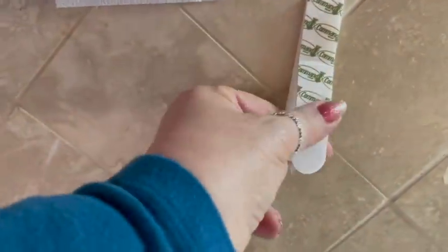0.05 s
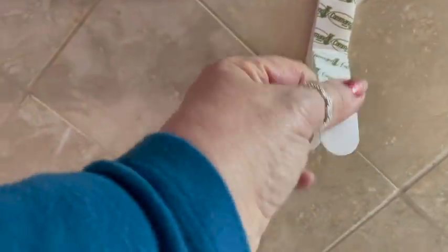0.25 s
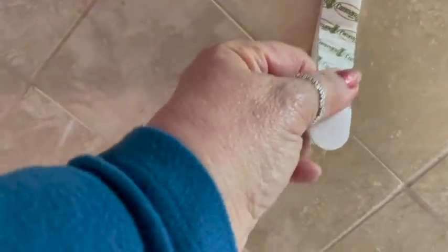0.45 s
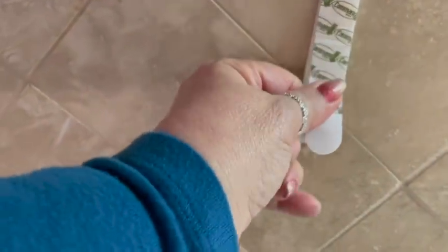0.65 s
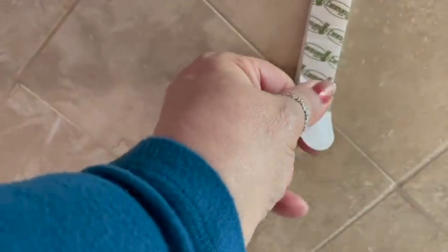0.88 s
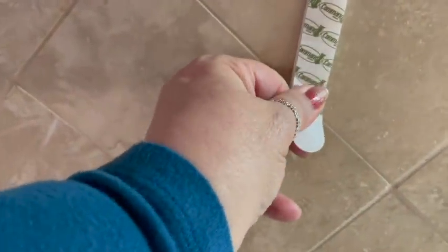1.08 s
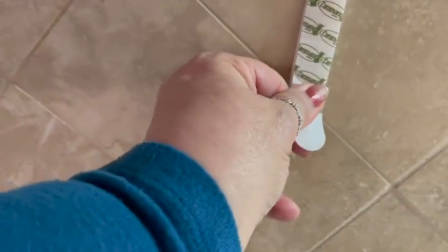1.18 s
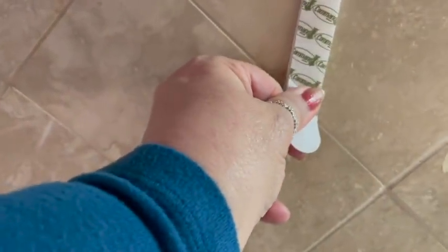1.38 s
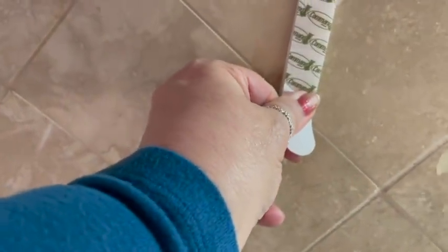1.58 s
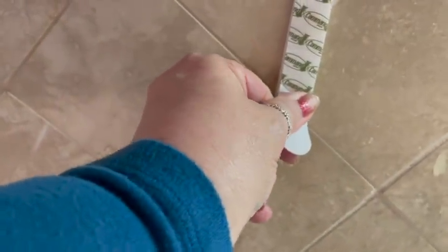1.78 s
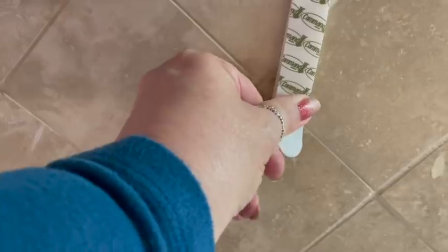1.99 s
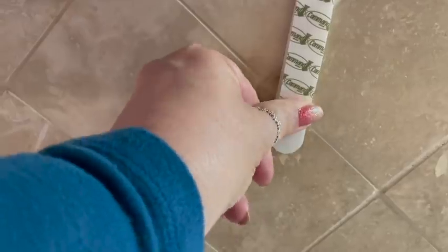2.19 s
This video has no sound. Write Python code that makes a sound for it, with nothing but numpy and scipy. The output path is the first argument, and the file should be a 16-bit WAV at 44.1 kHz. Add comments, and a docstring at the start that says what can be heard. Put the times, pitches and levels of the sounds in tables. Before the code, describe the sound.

Crisp crackling snaps of adhesive fastener strips pressed together by hand, followed by sparse loud clicks

```python
"""A hand presses two hook-and-loop strips together against a tiled wall, close to the microphone.
Over a faint room hum, plastic hooks snap home in a crunching run, then one by one: sharp pulses that ring
the strip and scatter off hand and tiles. Skin slides as grainy noise and the thumb thuds as damped sines.
A thin high whine joins later; near the end, noise-puff fingertip taps and a resonant fingernail click."""
import sys
import numpy as np
from scipy import signal
from scipy.fft import rfft, irfft, next_fast_len
from scipy.io import wavfile

SR = 44100
rng = np.random.default_rng(int(sys.argv[2]) if len(sys.argv) > 2 else 0)


def store_wav(level_fs):
    """Save 16-bit WAV to argv[1]."""
    pcm = np.round(np.clip(np.atleast_2d(level_fs), -1, 1) * 32767)
    wavfile.write(sys.argv[1], SR, pcm.T.astype(np.int16))


N = 99225
TIME = np.arange(N) / SR

# spectrum of a hook's snap: hz, level_db
SNAP_SPECTRUM = [(150, -24), (700, -16), (1500, -8), (2300, -6), (3000, -4.5), (4200, -1), (5700, -4.5),
                 (7000, -1.5), (8400, -3), (10500, 1), (12000, -4), (14000, 1), (15500, -4.5),
                 (17000, -30.5)]
# spectral regions of a snap's ring and top: hz, share
RING_REGION = [(5500, 0), (7500, 1), (9800, 1), (12500, 0)]
TOP_REGION = [(10000, 0), (13500, 1)]
# modes of the strip: hz, level_db (before each snap's chance offset)
STRIP_MODES = [(1085, -39), (1480, -48), (2450, -48), (3700, -50), (7500, -52), (10400, -52), (13900, -48)]


def from_db(db):
    """Decibels to gain."""
    return 10 ** (np.asarray(db) / 20)


def rms_one(x):
    """Scale to unit rms."""
    return x / np.sqrt(np.mean(x ** 2) + 1e-20)


def bins(size):
    """Transform frequencies in Hz, floored at 1 Hz for the logarithm."""
    return np.maximum(np.fft.rfftfreq(size, 1 / SR), 1)


def at_hz(points, hz):
    """Interpolate a spectrum on a log-frequency axis."""
    point_hz, values = np.transpose(points)
    return np.interp(np.log(hz), np.log(point_hz), values)


def level(points):
    """Gain over time from (s, dB) points."""
    return from_db(np.interp(TIME, *np.transpose(points)))


def colour(x, db_at):
    """Causal minimum-phase filter, by cepstrum folding, with the given dB at each frequency."""
    size = 2 * next_fast_len(x.shape[-1])
    cepstrum = irfft(np.log(from_db(db_at(bins(size)))))
    cepstrum[1:size // 2] *= 2
    cepstrum[size // 2 + 1:] = 0
    response = np.exp(rfft(cepstrum))
    return irfft(rfft(x, size) * response)[..., :x.shape[-1]]


def stereo_noise(side_db, size=N):
    """White noise, partly shared by both channels; side_db is side relative to mid."""
    mid, side = rng.standard_normal((2, size))
    return rms_one(mid + from_db(side_db) * side * np.array([[1], [-1]]))


def tail(t60_s, side_db, size):
    """Dense dying reflections of unit energy."""
    x = stereo_noise(side_db, size=size) * from_db(-60 * TIME[:size] / t60_s)
    return rms_one(x) / np.sqrt(size)


def add(out, start_s, x):
    """Mix a sound in at a time."""
    i = max(int(start_s * SR), 0)
    out[..., i:i + x.shape[-1]] += x[..., :max(N - i, 0)]


def grains(per_s, spread_db):
    """Random tiny clicks of uneven size and either sign."""
    sizes = from_db(spread_db * np.minimum(rng.exponential(1, N), 4)) * rng.choice([-1, 1], N)
    return sizes * (rng.random(N) < per_s / SR)


def spray(size):
    """Near reflections off hand and tiles: a quick burst and a fainter, longer one."""
    side_db, late_db = -7, -12
    early = tail(.036, side_db, size=size)
    late = tail(.07, side_db, size=size)
    return early + from_db(late_db) * late


def patch(f, pitch_hz):
    """Resonance of the patch of strip that flexes, in dB."""
    peak_db, half_width_share = 11.5, 0.044
    return peak_db / (1 + ((f / pitch_hz - 1) / half_width_share) ** 2)


def snaps(size=6000):
    """Each hook gives one sharp pulse, two echoes, the strip's modes and a spray of near reflections."""
    # hooks: start_s, level_db, body_db, ring_db, top_db, scatter_db, patch_pitch_hz
    hooks = [(0.0333, -29.5, -8.5, -0.5, 3, -1, 5160), (0.149, -25.5, -8.5, 7, 3, 4.5, 2480),
             (0.156, -18.5, -3, -0.5, 6, 1.5, 1160), (0.1919, -19.5, -12, 1, -1.5, 4, 2400),
             (0.2099, -26.5, -2, 4, -2.5, 6.5, 6200), (0.2446, -19.5, -3.5, 5.5, -2, 2.5, 14700),
             (0.2562, -13, -5, 1, 4, 6.5, 14380), (0.2638, -11.5, -6, 7, 5, 0, 14680),
             (0.2719, -25.5, 0, 6, 1.5, 2.5, 6725), (0.2743, -7, -20.5, 14, 11.5, 0.5, 1114),
             (0.2772, -8, 2, 0.5, 2.5, -2.5, 2630), (0.2846, -11.5, 6.5, 0, 3, 0, 1475),
             (.289, -3.5, -2, 11, 1, 2.5, 1074), (0.297, -20, -3, 4.5, -0.5, 0.5, 1060),
             (0.3144, -9, 2, 16.5, 5.5, 2.5, 1095), (0.329, -7, -1, 7, 1, -6.5, 1090),
             (0.337, -13, 0, 7.5, -6.5, -1.5, 2523), (0.34, -2.5, -9, 8, 6, -1.5, 1050),
             (0.3692, -1, -7.5, 6, 2.5, 5, 1045), (0.4253, -10.5, -3, 3, -4, 0, 2440),
             (0.4349, -8.5, -3, 0.5, 1.5, -8.5, 2750), (0.4358, -3, -9, 10.5, -2.5, 5, 3650),
             (0.458, -14, -10, -0.5, -2, 0, 6620), (.502, 0, -2.5, 7, 0.5, 0.5, 2110),
             (0.783, -33, -7, -3.5, -4, 6.5, 7600), (1.645, -15, -11, -5, 4.5, 8.5, 3390),
             (1.8606, -21.5, -11, -3.5, -0.5, 13.5, 2250), (1.8775, 8, -13, -2.5, -5.5, 4.5, 2530),
             (1.9167, -18, -4, 2.5, 0.5, 6, 1120), (1.94, -20, -4.5, 6.5, 6.5, 0, 2460)]
    # region of a snap's body: hz, share
    body_region = [(3000, 1), (6500, 0)]
    # first reflections off hand and wall: delay_s (before jitter), level_db
    echoes = [(.00105, -11), (.0022, -14)]
    strip_t60_s, mode_spread_db, echo_jitter_share = .065, 2, .06
    ripple_db, ripple_step_hz = 1.5, 361.6  # chance unevenness of each snap's spectrum
    same_path_share = .6  # energy share of reflections in common: the hand hardly moves

    out, t = np.zeros((2, N)), TIME[:size]
    knots_hz = np.arange(80) * ripple_step_hz
    same_paths = spray(size)
    for start_s, db, body_db, ring_db, top_db, scatter_db, pitch_hz in hooks:
        own_paths = spray(size)
        paths = np.sqrt(same_path_share) * same_paths + np.sqrt(1 - same_path_share) * own_paths
        x = from_db(scatter_db) * paths
        x[:, 0] += 1  # direct pulse
        for delay_s, echo_db in echoes:
            x[:, int(delay_s * SR * (1 + echo_jitter_share * rng.normal()))] += from_db(echo_db)
        for hz, mode_db in STRIP_MODES:
            decay_db = mode_db + mode_spread_db * rng.normal() - 60 * t / strip_t60_s
            x += from_db(decay_db) * np.cos(2 * np.pi * hz * t)
        ripple = ripple_db * rng.standard_normal(len(knots_hz))

        def snap_db(f):
            """Spectrum of this snap in dB."""
            regions = body_db * at_hz(body_region, f) + ring_db * at_hz(RING_REGION, f)
            regions += top_db * at_hz(TOP_REGION, f)
            uneven = np.interp(f, knots_hz, ripple)
            return db + at_hz(SNAP_SPECTRUM, f) + regions + patch(f, pitch_hz) + uneven

        add(out, start_s, colour(x, snap_db))
    return out


def crunch():
    """Many small hooks give way between the big snaps and ring the strip's lowest mode."""
    # crackle before scatter and colour: time_s, level_db
    crackle = [(0, -74.5), (.12, -71.5), (.23, -63.5), (.272, -36.5), (.298, -30.5), (.32, -48), (.42, -58),
               (.47, -53.5), (.6, -76.5)]
    hooks_per_s, spread_db, scatter_db = 550, 3.5, -3.5
    mode_hz = STRIP_MODES[0][0]
    clicks = rms_one(grains(hooks_per_s, spread_db)) * level(crackle)
    scattered = signal.fftconvolve(clicks[None], spray(size=3000))[:, :N]
    x = clicks + from_db(scatter_db) * scattered
    return colour(x, lambda f: at_hz(SNAP_SPECTRUM, f) - 3 * at_hz(RING_REGION, f)
                  + 2 * at_hz(TOP_REGION, f) + patch(f, mode_hz))


def rubs():
    """Skin slides on the backing paper: grains plus noise in short swishes."""
    # swishes: peak_s, rise_s, fall_s, level_db, tilt_db_per_octave
    swishes = [(0.09, 0.003, 0.018, -81, 12), (1.813, 0.012, 0.073, -66, 9.5),
               (1.878, 0.0061, 0.018, -33.5, 10), (1.93, 0.0042, 0.0076, -40.5, 6.5),
               (2.041, 0.0026, 0.042, -55.5, 7), (2.145, 0.012, 0.013, -51, -6)]
    # skin on paper: hz, level_db
    spectrum = [(300, -1), (600, -16.5), (1100, -3), (2400, 6), (3300, -1.5), (6000, -10.5), (9000, -9.5),
                (15000, -19)]
    out = np.zeros((2, N))
    for peak_s, rise_s, fall_s, db, tilt in swishes:
        friction = rms_one(grains(per_s=2700, spread_db=1)) + stereo_noise(side_db=-4.5)
        # tilt pivots at 2 kHz and is flat below 700 Hz
        x = rms_one(colour(friction, lambda f: at_hz(spectrum, f)
                           + tilt * np.log2(np.maximum(f, 700) / 2000)))
        envelope = np.exp(-np.maximum((peak_s - TIME) / rise_s, (TIME - peak_s) / fall_s))
        out += x * from_db(db) * envelope
    return out


def taps():
    """A fingertip taps the paper dully: noise puffs that start at once and die quickly."""
    # contacts: start_s, level_db, fall_s
    contacts = [(1.585, -53, .012), (2.039, -57, .016), (2.121, -56, .012)]
    # dull tap: hz, level_db
    spectrum = [(200, 13.5), (400, 2.5), (600, 1), (1100, 0.5), (1600, -21), (3000, -39), (8000, -44.5)]
    out = np.zeros((2, N))
    for start_s, db, fall_s in contacts:
        puff = rms_one(colour(stereo_noise(side_db=-2.0), lambda f: at_hz(spectrum, f)))
        add(out, start_s, puff * from_db(db) * np.exp(-TIME / fall_s))
    return out


def nail():
    """A fingernail clicks on the strip's edge: a scattered pulse with a few hollow resonances."""
    # resonances: hz, width_hz (full, at half amplitude), level_db
    resonances = [(1140, 170, -14.5), (1690, 460, -13), (3430, 230, -7), (4500, 2300, -15.5),
                  (10900, 5700, -21)]
    start_s = 2.0808

    def click_db(f):
        """Summed power of the resonances in dB."""
        return 10 * np.log10(sum(from_db(db) ** 2 / (1 + (2 * (f - hz) / width_hz) ** 2) ** 2
                                 for hz, width_hz, db in resonances))

    out, x = np.zeros((2, N)), spray(size=6000)
    x[:, 0] += 1  # direct pulse
    add(out, start_s, colour(x, click_db))
    return out


def thuds():
    """The thumb pushes on the wall: damped sines with a soft attack."""
    # pushes: start_s, level_db (before attack), pitch_hz, t60_s
    pushes = [(0.2332, -26.5, 274, 0.026), (.236, -39, 371, 0.15), (0.2433, -20.5, 197, 0.029),
              (0.243, -50, 82, 0.28), (0.2566, -31.5, 84, .13), (.282, -40, 160, .1),
              (.343, -46, 70.2, 0.19), (1.585, -51, 200, 0.076), (1.88, -40.5, 194.7, 0.064),
              (1.938, -42, 77, 0.13), (2.051, -45.5, 72, 0.15)]
    attack = 1 - np.exp(-TIME / 0.0032)
    out = np.zeros(N)
    for start_s, db, hz, t60_s in pushes:
        decay = from_db(db - 60 * TIME / t60_s)
        add(out, start_s, decay * attack * np.sin(2 * np.pi * hz * TIME))
    return out


def handling():
    """Low rustle of the hand: coloured noise of varying level."""
    # rustle: time_s, level_db
    rustle = [(0, -78), (.2, -64), (.25, -44), (.29, -43), (.32, -48), (.38, -50), (.43, -57), (.53, -56),
              (.85, -76), (1.8, -80), (1.9, -58), (2.25, -70)]
    # rustle colour: hz, level_db
    spectrum = [(30, -19.5), (80, 3), (200, -2.5), (380, -10.5), (600, -14.5), (1200, -14.5), (3000, -35)]
    return level(rustle) * rms_one(colour(stereo_noise(side_db=-11.5), lambda f: at_hz(spectrum, f)))


def ports(x):
    """The two microphone ports differ in phase and level."""
    # level balance: hz, left_minus_right_db
    balance = [(100, -0.5), (600, 10.5), (1300, 4), (2400, 0.5), (4400, 5.5), (6800, 5), (8500, 1),
               (15000, -0.5)]
    # phase by which the left port leads: hz, phase_rad
    lead = [(100, 0), (1000, 0), (3000, .6), (3700, 1.3), (5000, 1), (6000, -1), (6700, -1.2), (7600, -2.7),
            (10200, -4), (11900, -5.6), (13500, -6.3)]
    f = bins(2 * N)
    half_db = at_hz(balance, f) / 2
    left = from_db(half_db) * np.exp(1j * at_hz(lead, f))
    right = from_db(-half_db)
    return irfft(rfft(x, 2 * N) * np.array([left, right]))[:, :N]


def room(x):
    """Dull tail of the tiled room: convolution with coloured dying noise."""
    # tail colour: hz, level_db
    spectrum = [(200, -8), (600, -2), (1200, -5), (1900, -13), (2600, -14), (5000, -20), (7500, -29),
                (9000, -41), (14000, -32)]
    response = colour(tail(.55, side_db=-2.5, size=40000), lambda f: at_hz(spectrum, f))
    return signal.fftconvolve(x, response, axes=1)[:, :N]


def air_and_hiss():
    """Low room drone and faint hiss: two steady coloured noises."""
    # room's low drone: hz, level_db
    air_spectrum = [(20, -29), (40, -16.5), (62, 1), (85, -1), (120, -11), (170, -12), (260, -12),
                    (400, -20), (520, -29), (1100, -64)]
    # hiss: hz, level_db
    hiss_spectrum = [(500, 0), (1100, -3), (2200, -10), (5000, -17), (9000, -27), (16000, -29)]
    air_db, hiss_db = -60, -83
    air = rms_one(colour(stereo_noise(side_db=-8.5), lambda f: at_hz(air_spectrum, f)))
    hiss = rms_one(colour(stereo_noise(side_db=-26.5), lambda f: at_hz(hiss_spectrum, f)))
    return from_db(air_db) * air + from_db(hiss_db) * hiss


def hum():
    """Steady sines at random phase."""
    # tones: hz, rms_level_db
    tones = [(59.2, -70.5), (166.9, -71), (409.1, -73.5)]
    return sum(from_db(db) * np.sqrt(2) * np.sin(2 * np.pi * (hz * TIME + rng.random()))
               for hz, db in tones)


def whine():
    """Thin high whine: very narrow noise that fades in partway."""
    centre_hz, half_width_hz, level_db, start_s, fade_s = 13800, 8, -80, 1.38, 0.078
    x = rms_one(colour(rng.standard_normal(N),
                       lambda f: -20 * np.log10(1 + ((f - centre_hz) / half_width_hz) ** 2)))
    return from_db(level_db) * x * np.clip((TIME - start_s) / fade_s, 0, 1)


def scene():
    """Strip and hand close by, the room behind."""
    strip = snaps() + crunch() + rubs() + taps() + nail()
    close = ports(strip + thuds() + handling())
    return close + room(strip) + air_and_hiss() + hum() + whine()


def record(dry):
    """Peaks stop at full scale, then a steep low-pass cuts the top."""
    stopband_hz = 16900 + 400
    lowpass = signal.cheby2(16, 60, stopband_hz, fs=SR, output="sos")
    return signal.sosfilt(lowpass, np.clip(dry, -1, 1))


dry = scene()
out = record(dry)
store_wav(out)
```